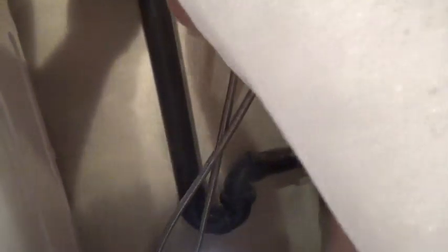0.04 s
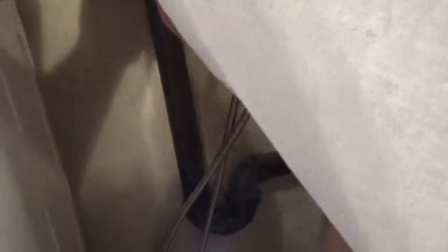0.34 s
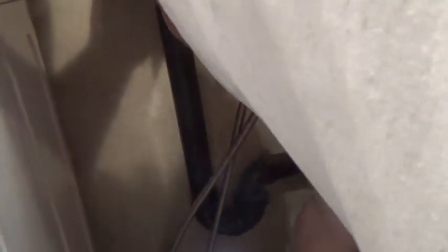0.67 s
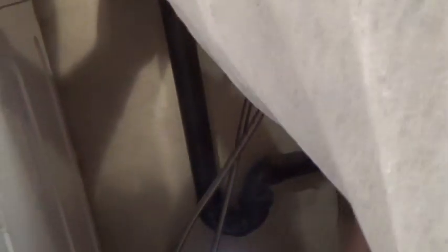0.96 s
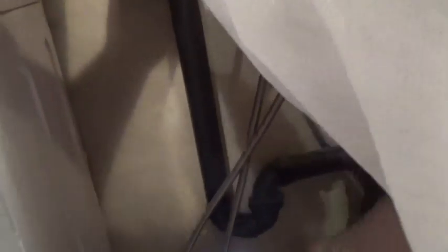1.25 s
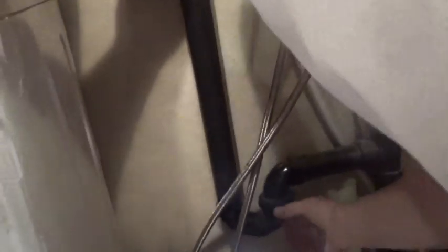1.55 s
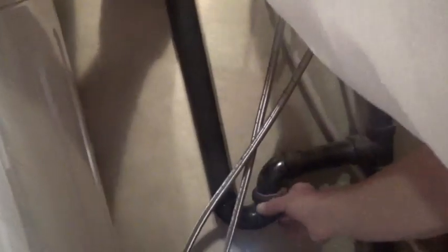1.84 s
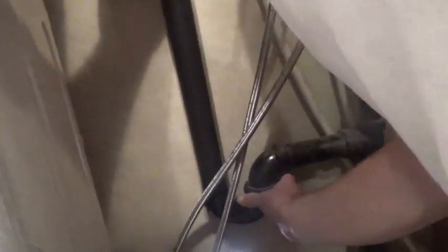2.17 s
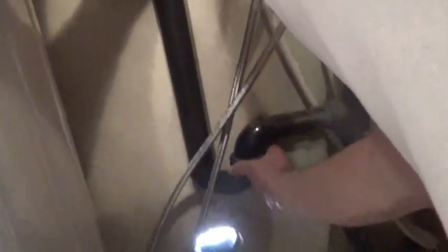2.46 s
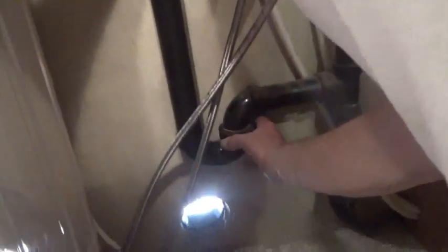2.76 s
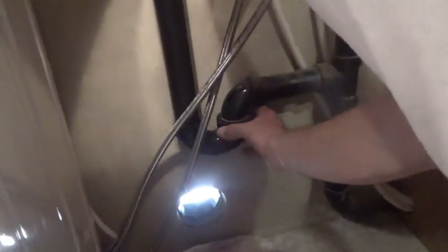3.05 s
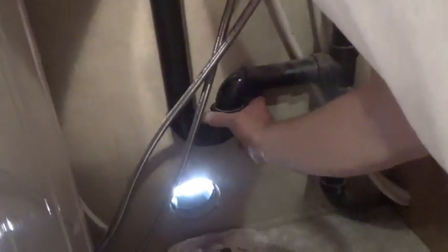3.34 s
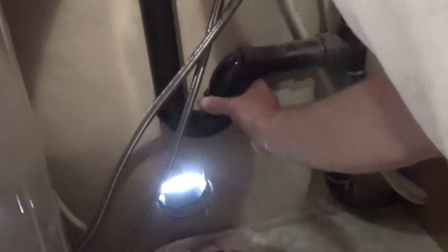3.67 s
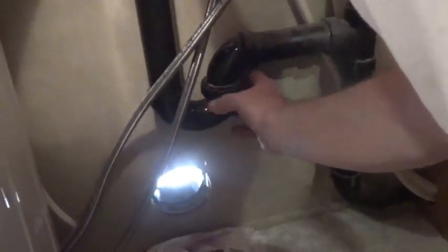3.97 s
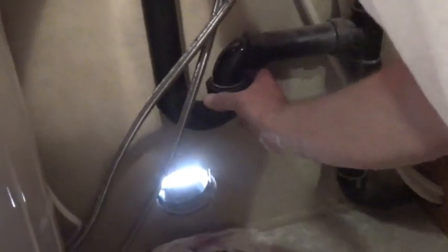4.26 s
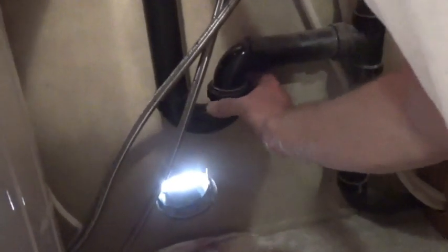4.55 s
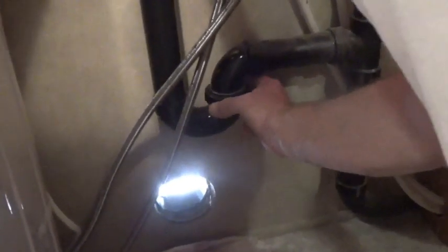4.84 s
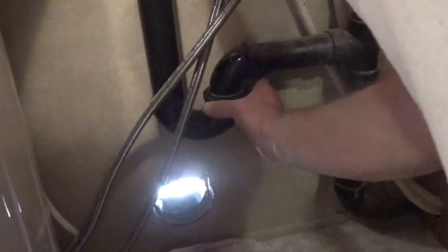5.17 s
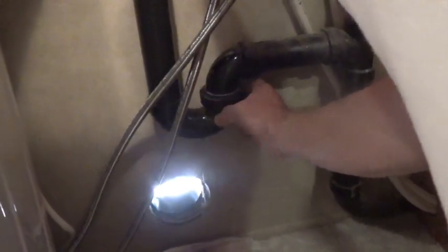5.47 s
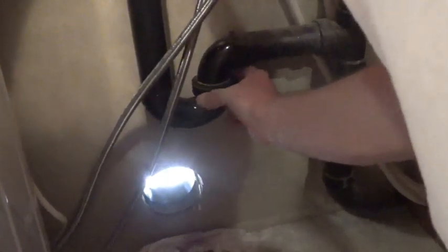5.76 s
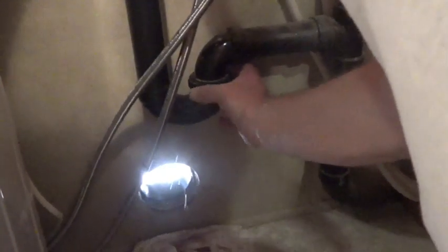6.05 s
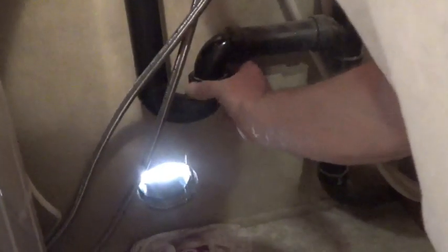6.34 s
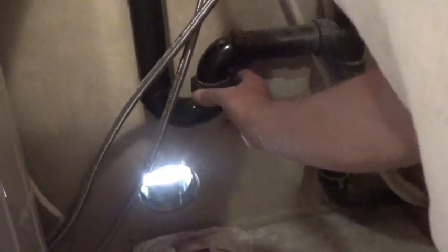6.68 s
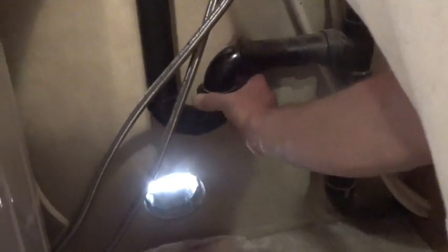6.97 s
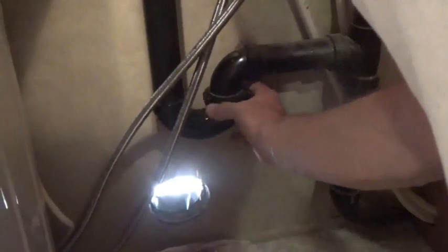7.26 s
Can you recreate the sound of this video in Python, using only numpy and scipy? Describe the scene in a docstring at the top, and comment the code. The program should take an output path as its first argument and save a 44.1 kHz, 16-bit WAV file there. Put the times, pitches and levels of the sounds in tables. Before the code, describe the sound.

A sleeve drags and rustles against a cabinet panel for the first second, with a sharp plastic knock at about 0.4 seconds. Until about 3.4 seconds things are quieter: soft rubbing, light ticks and a few tiny squeaks as a hand finds the drain trap and grips its nut. From about 3.5 seconds the twisting begins, and the pipe rocks with hollow, briefly ringing clunks, roughly two a second, strongest between 4.2 and 6.5 seconds. Between them the thread grinds in short bursts, the loose joint clicks and skin swishes over the plastic for a new grip. A sharper knock comes near 5.7 seconds with more sleeve rustle, and high plastic chirps stand out around 6.2 and 6.7 seconds. Slightly softer clunks continue to the end at about 7.5 seconds. Everything is close and boxy inside the cramped cabinet, over faint room noise.

```python
"""Inside a cramped sink cabinet, two microphones close to a plastic drain trap as a hand twists its slip nut.
Sleeve cloth drags past at first. Then each twist rocks the pipe with a hollow clunk, the thread sticks
and slips in a grind, and the hand hisses back for a new grip. The loose joint knocks, the plastic
chirps, and the close walls colour everything, over faint room noise."""
import sys
import numpy as np
from scipy import signal
from scipy.fft import rfft, irfft
from scipy.io import wavfile

SR = 44100
rng = np.random.default_rng(int(sys.argv[2]) if len(sys.argv) > 2 else 0)


def pcm_store(signal):
    """Save signal as 16-bit PCM."""
    levels = np.round(np.clip(np.atleast_2d(signal), -1, 1) * 32767)
    wavfile.write(sys.argv[1], SR, levels.astype(np.int16).T)


N = 331191
TIME = np.arange(N) / SR
EDGE_HZ = 11230  # top of the microphones' band

# Spectra of grinding and of chirping plastic. Each row: frequency in Hz, level in dB.
GRIND_SPECTRUM = [(40, -26), (120, -1), (190, -11), (260, 0), (370, 2), (550, 0), (800, 4.5), (1100, -12.5),
                  (1400, -9.5), (2100, -4.5), (4000, -48.5), (11000, -77)]
CHIRP_SPECTRUM = [(150, -11.5), (260, -1.5), (1200, -9), (2300, -3), (3700, 0.5), (5000, -2.5), (6500, -4),
                  (8200, -0.5), (9500, -3.5), (11200, -16)]
# The hand sliding round the pipe for a new grip. Each row: fastest moment in seconds, level in dB,
# speeding up and slowing down in seconds, pitch of the palm's hollow in Hz, its level in dB.
HAND_SLIDES = [(1.004, -58, 0.052, 0.016, 1700, -42), (1.337, -50.5, 0.013, 0.046, 900, -50),
               (2.455, -48, 0.022, 0.11, 2420, -79), (3.225, -52.5, 0.077, 0.067, 910, -40.5),
               (3.32, -49.5, 0.063, 0.025, 1783, -44), (3.689, -38.5, 0.025, 0.076, 1785, -44),
               (4.055, -47.5, 0.01, 0.14, 2520, -40.5), (4.149, -42, 0.016, 0.056, 1800, -44),
               (4.57, -45, 0.11, 0.027, 1910, -36.5), (4.957, -41.5, 0.044, 0.043, 1630, -37.5),
               (5.42, -52, 0.081, 0.14, 2820, -35.5), (5.868, -42.5, 0.043, 0.043, 1620, -35),
               (6.406, -43.5, 0.072, 0.036, 1780, -40), (6.89, -41.5, 0.035, 0.042, 1840, -36.5),
               (7.5, -46, 0.041, 0.061, 1740, -49)]


def amp(db):
    """Decibels to gain."""
    return 10 ** (np.asarray(db) / 20)


def unit(x):
    """Scales to rms 1."""
    return x / np.sqrt(np.mean(x ** 2) + 1e-20)


def read(points, hz):
    """Reads a table on a log-frequency axis."""
    f, value = np.transpose(points)
    return np.interp(np.log(hz + 1), np.log(f + 1), value)


def add(mix, s, sound):
    """Mixes a sound in at s seconds."""
    part = mix[max(round(s * SR), 0):][:len(sound)]
    part += sound[:len(part)]


def colour(x, spectrum, size=2048):
    """Causal filter of unit energy, shaped by (Hz, dB) points and cut above the band edge."""
    hz = abs(np.fft.fftfreq(size, 1 / SR))
    log_gain = np.log(amp(read(spectrum, hz) - 40 * (hz > 1.1 * EDGE_HZ)))
    taps = np.fft.ifft(np.exp(np.conj(signal.hilbert(log_gain)))).real[:size // 2]
    return signal.oaconvolve(x, taps / np.linalg.norm(taps))[:len(x)]


def resonate(x, hz, t60):
    """One mode of gain 1 at its centre."""
    radius = np.exp(-np.log(1000) / (t60 * SR))
    return 2 * signal.lfilter([1 - radius], [1, -radius * np.exp(2j * np.pi * hz / SR)], x).real


def slips(per_s, spread_db):
    """Micro-slips of friction: random clicks of uneven size."""
    size = amp(spread_db * np.minimum(rng.exponential(1, N), 4))
    return unit(size * rng.choice([-1, 1], N) * (rng.random(N) < per_s / SR))


def waver(per_s, depth_db):
    """Gain of an unsteady contact pressure."""
    draws = rng.standard_normal(N)
    return amp(depth_db * np.interp(TIME * per_s, np.arange(N), draws))


def room_tone():
    """Steady faint room noise, mostly common to both microphones."""
    # The room's background. Each row: frequency in Hz, level in dB.
    spectrum = [(15, -35), (25, -17), (75, -6), (118, -22.5), (303, -6), (391, -16), (907, -14),
                (1550, -7.5), (1710, -8.5), (2100, -30), (11000, -38), (14300, -54), (22000, -120)]
    shared, left, right = (colour(rng.standard_normal(N), spectrum) for _ in range(3))
    return amp(-64.5) * (shared + amp(-12) * np.array([left, right]))


def sleeve_slide():
    """Sleeve cloth slips in fine grains: a hiss, and a duller scuff below it."""
    # How hiss and scuff rise and fall. Each row: time in seconds, level in dB.
    hiss_levels = [(0.0, -35), (0.14, -39), (0.71, -46), (0.94, -62), (1.11, -57.5), (1.4, -51),
                   (1.99, -57.5), (2.15, -56.5), (2.4, -60), (2.61, -49.5), (3.18, -49.5), (3.35, -59.5),
                   (4.0, -56.5), (4.1, -57), (4.98, -55.5), (5.08, -57), (5.25, -64), (5.48, -64),
                   (5.635, -52), (5.7, -42), (5.85, -40), (6.09, -46), (6.5, -57), (6.8, -47.5),
                   (7.12, -57.5), (7.44, -51.5), (7.51, -47)]
    scuff_levels = [(0.0, -47), (0.14, -45), (1.0, -63.5), (1.63, -53), (1.86, -52), (2.28, -58.5),
                    (2.7, -54.5), (3.51, -58.5), (3.93, -52), (4.75, -50.5), (5.25, -56), (5.62, -51.5),
                    (5.83, -39.5), (5.93, -43.5), (6.3, -53), (6.94, -47), (7.51, -49)]
    # Their spectra. Each row: frequency in Hz, level in dB.
    hiss_spectrum = [(200, -7), (1500, -17), (2500, 1.5), (4300, -0.5), (6000, 0.5), (7200, 0), (8800, 7),
                     (10000, 4), (11200, -7)]
    scuff_spectrum = [(40, -28), (130, -5.5), (260, -0.5), (500, 5.5), (1000, 2), (1700, 0.5), (2500, 2),
                      (3600, -2.5), (6000, -11), (11000, -33)]
    hiss = colour(slips(per_s=17000, spread_db=-2), hiss_spectrum)
    hiss *= amp(np.interp(TIME, *np.transpose(hiss_levels)))
    scuff = colour(slips(per_s=8000, spread_db=1), scuff_spectrum)
    scuff *= amp(np.interp(TIME, *np.transpose(scuff_levels)))
    return amp(-2) * (hiss + scuff) * waver(per_s=61, depth_db=2)


def cloth_drag():
    """Coarse cloth catches on the cabinet panel, which hums."""
    # Strokes of the cloth. Each row: start in seconds, length in seconds, level in dB.
    strokes = [(0.0, 0.033, -33), (0.048, 0.074, -33.5), (0.194, 0.15, -29.5), (0.359, 0.15, -42),
               (0.754, 0.12, -43), (0.937, 0.11, -54.5), (1.13, 0.05, -54), (1.829, 0.15, -47.5),
               (3.022, 0.039, -46), (3.123, 0.21, -56)]
    # Spectrum of the drag. Each row: frequency in Hz, level in dB.
    spectrum = [(40, 6), (110, -26), (170, -6), (260, -7.5), (400, -10.5), (720, -1.5), (900, -5),
                (1150, -9), (1400, -15), (2000, -24.5), (4000, -19.5), (11000, -15.5)]
    # Modes of the panel. Each row: frequency in Hz, level in dB, t60 in seconds.
    panel_modes = [(165.6, 8.5, 0.17), (480, 8, 0.035), (710, -2, 0.018), (810, 12.5, 0.022),
                   (1130, 3.5, 0.012), (1900, -1, 0.013)]
    gain = np.zeros(N)
    for s, length, db in strokes:
        t = np.arange(0, length, 1 / SR)
        add(gain, s, amp(db) * abs(np.sin(np.pi * t / length)) ** 0.27)  # a flat-topped arch
    catches = slips(per_s=2600, spread_db=3) * gain
    hum = sum(amp(db) * resonate(catches, hz, t60) for hz, db, t60 in panel_modes)
    return amp(-3) * colour(catches, spectrum) + hum


def joint_knocks(contact_s=0.00057, snap_s=0.0038, chatter_s=0.019, rattle_s=0.0083):
    """Each knock is a hollow thud, a snap with chatter after it, and a rattle as the loose faces seat."""
    # Knocks of the joint. Each row: start in seconds, thud level in dB, crack level in dB,
    # thud pitch in Hz, thud t60 in seconds.
    knocks = [(0.0475, -23.5, -33, 715, 0.017), (0.3514, -16.5, -30.5, 980, 0.018),
              (0.3572, -25.5, -48, 1410, 0.0077), (0.437, -33, -64, 460, 0.026),
              (0.533, -34.5, -42.5, 443, 0.019), (0.654, -43, -65, 440, 0.049),
              (0.882, -37.5, -50.5, 267, 0.025), (1.0099, -35, -46, 1600, 0.016),
              (2.051, -34, -71, 696, 0.0034), (2.079, -36.5, -52, 220, 0.035),
              (2.728, -37.5, -62, 348, 0.015), (3.498, -43, -48.5, 283.5, 0.036),
              (3.537, -38.5, -55, 330, 0.019), (3.9344, -31.5, -39, 600, 0.015),
              (3.9718, -31.5, -42, 600, 0.036), (4.066, -37.5, -58, 595, 0.015),
              (4.301, -28.5, -54, 570, 0.0061), (4.3384, -31.5, -36.5, 476, 0.0089),
              (4.7489, -30.5, -38, 296, 0.0057), (4.7999, -27, -44, 693, 0.027),
              (5.2298, -32.5, -49.5, 522, 0.0063), (5.2572, -30.5, -35, 603, 0.012),
              (5.324, -26, -45.5, 594, 0.0063), (5.511, -37.5, -39, 424, 0.025),
              (5.537, -36, -54, 730, 0.016), (5.5537, -40, -50, 626, 0.014),
              (5.652, -13.5, -25.5, 645, 0.015), (5.8597, -25, -40, 1640, 0.016),
              (6.829, -42, -57, 502, 0.019), (6.9703, -31, -54, 804, 0.018),
              (7.1505, -37.5, -49, 400, 0.0075)]
    # Spectrum of the crack. Each row: frequency in Hz, level in dB.
    crack_spectrum = [(60, -18), (160, 0), (270, 6.5), (400, 9.5), (600, 5), (1400, -2.5), (2500, -1),
                      (4300, -4), (6000, -7.5), (8500, -1), (11200, -9)]
    thuds, cracks, rattles = np.zeros((3, N))
    t = TIME[:SR // 8]
    crack_decay = amp(1.5) * np.exp(-t / snap_s) + amp(-3) * np.exp(-t / chatter_s)
    for s, thud_db, crack_db, hz, t60 in knocks:
        ring = np.sin(2 * np.pi * hz * t) * (1 - np.exp(-t / contact_s)) * amp(-60 * t / max(t60, .004))
        add(thuds, s, amp(thud_db) * ring / abs(ring).max())
        add(cracks, s, amp(crack_db) * rng.standard_normal(len(t)) * crack_decay)
        add(rattles, s, amp(thud_db) * rng.standard_normal(len(t)) * np.exp(-t / rattle_s))
    impacts = thuds + colour(cracks, crack_spectrum)
    return amp(1.5) * impacts + amp(-10) * colour(rattles, GRIND_SPECTRUM)


def nut_chirps(ring_t60=0.017, overtone=1.6, creep_s=0.018):
    """A quick burst of slips creeps up, swells and dies, ringing two modes in the wall of the nut."""
    # Plastic sticking and slipping. Each row: time in seconds, level in dB, pitch in Hz, swell in seconds.
    chirps = [(0.679, -30, 4930, 0.0058), (1.189, -35.5, 3650, 0.0033), (1.864, -32.5, 5100, 0.0035),
              (1.891, -27.5, 3800, 0.0038), (1.916, -31, 5060, 0.0041), (2.788, -29, 5030, 0.0028),
              (3.368, -36, 3750, 0.0032), (3.419, -34.5, 3480, 0.0028), (3.477, -35.5, 4850, 0.0024),
              (3.557, -26.5, 4750, 0.0063), (3.576, -28, 3930, 0.004), (3.588, -27, 3730, 0.0036),
              (3.678, -25, 3280, 0.0021), (3.75, -28, 4240, 0.0041), (3.958, -28, 4270, 0.0019),
              (4.043, -35, 3470, 0.0042), (4.056, -27, 4560, 0.0017), (4.083, -28.5, 4020, 0.0019),
              (4.243, -30, 4240, 0.0026), (4.821, -29, 4300, 0.0025), (4.83, -28.5, 4230, 0.0062),
              (5.042, -31, 4100, 0.0032), (5.359, -26, 3750, 0.0027), (5.398, -21.5, 5100, 0.0026),
              (5.419, -23.5, 4000, 0.0062), (5.577, -30.5, 4003, 0.0064), (5.858, -25, 1800, 0.0058),
              (6.158, -31, 3600, 0.0019), (6.233, -20.5, 3770, 0.0046), (6.242, -19.5, 5070, 0.0069),
              (6.475, -32.5, 3580, 0.0057), (6.547, -35, 4360, 0.009), (6.632, -40, 2030, 0.0092),
              (6.646, -30.5, 3645, 0.0054), (6.7422, -14, 3873, 0.0049), (7.196, -28.5, 3724, 0.0071),
              (7.237, -31, 3800, 0.0067), (7.359, -32.5, 4650, 0.0049)]
    out, t = np.zeros(N), TIME[:SR // 8] - .04  # the creep begins ahead of the swell
    for s, db, hz, swell_s in chirps:
        age = np.maximum(t, 0) / swell_s
        slipping = (age * np.exp(1 - age)) ** 2 + amp(-12) * np.exp(-abs(t) / creep_s)
        burst = rng.standard_normal(len(t)) * slipping
        ring = amp(7) * resonate(burst, hz, ring_t60) + amp(2) * resonate(burst, overtone * hz, ring_t60)
        add(out, s + t[0], amp(db) * (burst + ring))
    return amp(-12.5) * colour(out, CHIRP_SPECTRUM)


def slide_swell(rise_s, fall_s, drop_db=13):
    """One second of a slide of the hand, fastest at its rounded top in the middle."""
    t = TIME[:SR] - .5
    return amp(-drop_db * abs(t / np.where(t < 0, rise_s, fall_s)) ** 1.72)


def hand_speed():
    """Gain of all the slides of the hand together."""
    gain = np.zeros(N)
    for s, db, rise_s, fall_s, _, _ in HAND_SLIDES:
        add(gain, s - .5, amp(db) * slide_swell(rise_s, fall_s))
    return gain


def hand_swishes(hollow_t60=0.0034):
    """Dry skin slides over smooth plastic; the cupped palm adds a hollow tone, new with each grip."""
    # Skin on plastic. Each row: frequency in Hz, level in dB.
    spectrum = [(100, -33), (260, -8), (500, -10), (1000, -0.5), (1700, 2), (2600, 4), (4300, 1.5),
                (6200, -3.5), (8800, 5.5), (11200, -6)]
    grains = slips(per_s=11000, spread_db=-0.5) * waver(per_s=110, depth_db=3) * hand_speed()
    hollow = np.zeros(N)
    for s, _, rise_s, fall_s, hz, db in HAND_SLIDES:
        tone = resonate(rng.standard_normal(SR), hz, hollow_t60)
        add(hollow, s - .5, amp(db) * slide_swell(rise_s, fall_s) * tone)
    return amp(5) * colour(grains, spectrum) + amp(3.5) * hollow


def stray_squeaks(per_s=30, swell_s=0.0029):
    """Under a moving hand the plastic catches at random, in tiny squeaks."""
    motion = hand_speed() + amp(-1.5) * turn_effort()
    catches = (rng.random(N) < per_s / SR) * amp(rng.uniform(-34, 0, N))
    age = TIME[:SR // 20] / swell_s
    bursts = signal.oaconvolve(catches, age * np.exp(1 - age))[:N] * rng.standard_normal(N) * motion
    return amp(4.5) * colour(bursts, CHIRP_SPECTRUM) + amp(19) * resonate(bursts, hz=5200, t60=0.0017)


def finger_skids(glide_s=0.027, attack_s=0.0043, decay_s=0.045, ring_t60=0.016):
    """A skid hums in a narrow band that sinks as the finger slows."""
    # Fingers landing on the pipe. Each row: start in seconds, level in dB, first and last pitch in Hz.
    skids = [(1.189, -38.5, 655, 409), (1.382, -40.5, 623, 421)]
    out, t = np.zeros(N), TIME[:SR // 4]
    envelope = np.minimum(t / attack_s, 1) * np.exp(-t / decay_s)
    for s, db, first_hz, last_hz in skids:
        hum = signal.hilbert(unit(resonate(rng.standard_normal(len(t)), last_hz, ring_t60)))
        glide_cycles = np.cumsum((first_hz - last_hz) * np.exp(-t / glide_s)) / SR
        add(out, s, amp(db) * (hum * np.exp(2j * np.pi * glide_cycles)).real * envelope)
    return out


def turn_effort(decay_s=np.inf, attack_s=0.008, release_s=0.014):
    """Each turn starts abruptly, fades as the wrist runs out of travel, and stops."""
    # Turns of the nut. Each row: start in seconds, length in seconds, level in dB, fade over it in dB.
    turns = [(1.311, 0.053, -50.5, -0.5), (1.387, 0.21, -56, 6), (2.715, 0.17, -54, 5),
             (3.884, 0.029, -48, 3.5), (4.161, 0.043, -45.5, 4), (4.549, 0.053, -48.5, 0),
             (5.394, 0.097, -50, 0.5), (5.51, 0.061, -38.5, 2.5), (5.682, 0.099, -47, 8.5),
             (5.858, 0.038, -36.5, 14), (6.029, 0.055, -43, 5.5), (6.546, 0.039, -44, 5.5),
             (6.629, 0.025, -44.5, 0.5), (6.667, 0.072, -42.5, 6), (6.797, 0.064, -44, 4),
             (7.039, 0.052, -43.5, 8), (7.414, 0.036, -46, 3.5)]
    gain, t = np.zeros(N), TIME[:SR // 2]
    for s, length, db, fade_db in turns:
        held = np.minimum(t / attack_s, 1) * np.exp(-np.maximum(t - length, 0) / release_s - t / decay_s)
        add(gain, s, held * amp(db - fade_db * np.minimum(t / length, 1)))
    return gain


def stick_slip(fast_hz=260, slow_hz=130, uneven_db=4):
    """The thread catches and lets go in a ragged train of ticks, quicker under a harder twist."""
    effort = turn_effort()
    rate = slow_hz + (fast_hz - slow_hz) * effort / (effort + amp(-38))
    rate *= waver(per_s=400, depth_db=3)
    ticks = np.diff(np.floor(np.cumsum(rate) / SR), prepend=0)
    return unit(ticks * rng.choice([-1, 1], N) * amp(uneven_db * np.clip(rng.standard_normal(N), -2, 2)))


def thread_grind(bite_s=0.019):
    """The thread judders through each turn and rings the trap, brightest as it breaks loose."""
    # Modes of the trap's hollow body. Each row: frequency in Hz, level in dB, t60 in seconds.
    trap_modes = [(500, 12, 0.017), (725, 13, 0.012), (1200, 3, 0.043), (2070, 3.5, 0.0089)]
    bite_spectrum = [(400, -20), (1100, 17), (2000, 13), (3000, 11), (4400, 4), (6000, -2), (11000, -46)]
    ticks, effort = stick_slip(), turn_effort()
    grains = slips(per_s=1300, spread_db=3) * waver(per_s=220, depth_db=1.5)
    judder = ticks * effort
    grind = colour(grains * effort + amp(-8) * judder, GRIND_SPECTRUM)
    body = sum(amp(db) * resonate(judder, hz, t60) for hz, db, t60 in trap_modes)
    bite = (ticks + amp(16) * grains) * turn_effort(decay_s=bite_s)
    return grind + amp(1.5) * body + amp(-10) * colour(bite, bite_spectrum)


def faint_rising_whistle(start_s=1.915, end_s=2.075, first_hz=1700, last_hz=1860, ring_t60=0.02):
    """A faint, thin whistle near 1.8 kHz swells, rises a little and fades."""
    out, progress = np.zeros(N), np.linspace(0, 1, round((end_s - start_s) * SR))
    tone = signal.hilbert(unit(resonate(rng.standard_normal(SR), first_hz, ring_t60)))[:len(progress)]
    glide_cycles = np.cumsum((last_hz - first_hz) * progress) / SR
    whistle = (tone * np.exp(2j * np.pi * glide_cycles)).real
    add(out, start_s, amp(-54) * np.sin(np.pi * progress) * whistle)
    return out


def seal_ticks(decay_s=0.0031):
    """The seal lets go with tiny, very high ticks."""
    # Ticks of the seal. Each row: start in seconds, level in dB.
    ticks = [(2.162, -51.5), (4.743, -56), (5.1396, -47), (6.325, -47), (6.602, -54)]
    out, t = np.zeros(N), TIME[:SR // 20]
    for s, db in ticks:
        add(out, s, amp(db) * rng.standard_normal(len(t)) * np.exp(-t / decay_s))
    return amp(13.5) * colour(out, [(1000, -17), (7000, -19.5), (9500, 1), (11000, -8.5)])


def pipe_clunks(swell_s=0.0041, ring_swell_s=0.016, body_t60=0.4, rasp_t60=0.21, echo_hz=610):
    """The pipe rocks against one spot on its far support, so each clunk has the same rasp and ring."""
    # Clunks at the twists. Each row: start in seconds, level in dB.
    clunks = [(3.4618, -15), (3.6536, -12), (3.7972, -4), (4.2445, 1.5), (4.648, 0.5), (5.053, -1.5),
              (5.5825, -2.5), (5.9587, 0), (6.1425, -5), (6.485, -2.5), (6.6604, -7), (6.9676, -5),
              (7.1727, -10), (7.375, -5.5)]
    # A clunk's scattered sound, hollow body and short rasp. Each row: frequency in Hz, level in dB.
    body_spectrum = [(100, -17), (190, -17), (270, 1.5), (380, -1.5), (540, 3.5), (660, -6), (860, -1),
                     (1300, -10), (2100, -9), (4000, -34), (11000, -51)]
    rasp_spectrum = [(300, -3), (850, 6.5), (1350, -9.5), (2000, -4), (2900, -12.5), (4500, -21),
                     (11000, -44)]
    # Modes of the pipe run. Each row: frequency in Hz, level in dB, t60 in seconds.
    pipe_modes = [(260.7, -40, 0.29), (527, -52, .25), (566, -46.5, 0.3), (746, -44, 0.17), (886, -36, .11),
                  (1094, -47, .3), (1822, -59.5, 0.29), (2020, -64, 0.15)]
    # Echoes along the pipe and the hollow behind the cabinet. Each row: delay in seconds, level in dB.
    echoes = [(.0112, 0.5), (.0155, -7), (.0267, -12.5), (.0308, -1), (.0425, -9), (.056, -10.5),
              (.0645, -8)]
    out, t = np.zeros(N), TIME[:SR // 2]
    body = colour(rng.standard_normal(len(t)), body_spectrum) * amp(-40.5 - 60 * t / body_t60)
    rasp = colour(rng.standard_normal(len(t)), rasp_spectrum) * amp(-32 - 60 * t / rasp_t60)
    ring = sum(amp(db - 60 * t / t60) * np.sin(2 * np.pi * hz * t) for hz, db, t60 in pipe_modes)
    clunk = (body + rasp) * (1 - np.exp(-t / swell_s)) + ring * (1 - np.exp(-t / ring_swell_s))
    thump = np.sin(2 * np.pi * echo_hz * t) * t * amp(-60 * t / 0.0055)
    for delay, db in echoes:
        add(clunk, delay, amp(db - 27.5) * thump / abs(thump).max())
    for s, db in clunks:
        add(out, s, amp(db) * clunk)
    return out


def cabinet(x, bass_t60=0.064, treble_t60=0.11, shift_hz=0.8895, tail_count=3):
    """Modes and close walls, then a short diffuse tail at each microphone, shifting as the arm moves."""
    # Air and pipe resonances. Each row: frequency in Hz, level in dB, t60 in seconds.
    modes = [(162.5, -0.5, 0.28), (258, 3, 0.16), (288.6, 5.5, 0.25), (373.6, -1.5, 0.14), (505, 0, 0.084),
             (569, 4, 0.2), (745, -4, 0.33), (896, -6, 0.043), (1056, -16, 0.4), (1135, -13, 0.079),
             (1783, -3.5, 0.028), (4310, -2.5, 0.016)]
    # Reflections off the nearest walls. Each row: delay in seconds, level in dB.
    walls = [(.0071, -37), (0.0113, -21.5)]
    t = TIME[:SR // 3]
    direct = signal.unit_impulse(len(t))
    response = direct + sum(amp(db) * resonate(direct, hz, t60) for hz, db, t60 in modes)
    for delay, db in walls:
        add(response, delay, amp([db]))
    hz, age, noise = signal.stft(rng.standard_normal((tail_count, 2, len(t))), SR, nperseg=256)
    t60 = read([(310, bass_t60), (7100, treble_t60)], hz)[:, None]
    # long waves reach both microphones alike, so little bass is diffuse
    diffuse_db = read([(150, -5), (1100, 0.3), (9000, -6.5)], hz)[:, None]
    _, tails = signal.istft(noise * amp(diffuse_db - 60 * age / t60), SR, nperseg=256)
    tails = tails[..., :len(t)] * np.minimum(t / 0.002, 1)
    out = signal.oaconvolve(x, response)[:N]
    for k, tail in enumerate(tails):  # the tails crossfade in turn
        share = np.cos(np.pi * (shift_hz * TIME + k / tail_count)) ** 2 / np.sqrt(3 * tail_count / 8)
        diffuse = signal.oaconvolve((x * share)[None], tail / np.linalg.norm(tail[0]), axes=1)[:, :N]
        out = out + amp(-7) * diffuse
    return amp(-0.5) * out


def scene(low_cut_hz=140):
    """All the sounds inside the cabinet, over room tone; such small parts radiate little bass."""
    rubs = sleeve_slide() + hand_swishes() + cloth_drag() + finger_skids()
    whistle = faint_rising_whistle()
    plumbing = thread_grind() + pipe_clunks() + joint_knocks()
    squeaks_and_ticks = stray_squeaks() + nut_chirps() + seal_ticks()
    low_cut = signal.butter(3, low_cut_hz, "high", fs=SR, output="sos")
    return cabinet(signal.sosfilt(low_cut, rubs + whistle + plumbing + squeaks_and_ticks)) + room_tone()


def record(dry):
    """Two close microphones, slightly apart in phase and level, then the band limit."""
    # Phase across the pair. Each row: frequency in Hz, lead of the left in radians.
    left_lead = [(0, 0), (120, -.3), (600, -.8), (1720, -.8), (4310, -.5), (11800, -.1)]
    # Balance of the pair. Each row: frequency in Hz, left minus right in dB.
    balance = [(60, 0.0), (110, 0.15), (190, 0.38), (350, 0.13), (620, 0.48), (1120, 0.83), (2010, 0.87),
               (3620, 0.47), (6490, 0.19), (11700, 0.0)]
    hz = np.fft.rfftfreq(N, 1 / SR)
    left = np.exp(.5j * read(left_lead, hz)) * amp(read(balance, hz) / 2)
    pair = irfft(rfft(dry) * np.array([left, 1 / left]), N)
    band_limit = signal.firwin(1023, EDGE_HZ, window=("kaiser", 8), fs=SR)
    return signal.oaconvolve(pair, band_limit[None], "same")


dry = scene()
out = record(dry)
pcm_store(out)
```